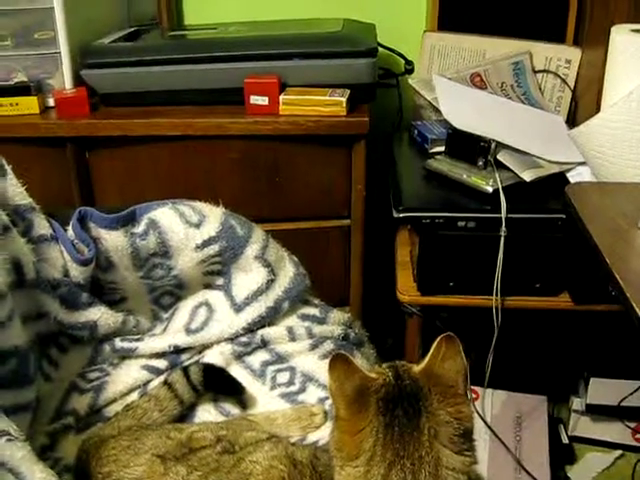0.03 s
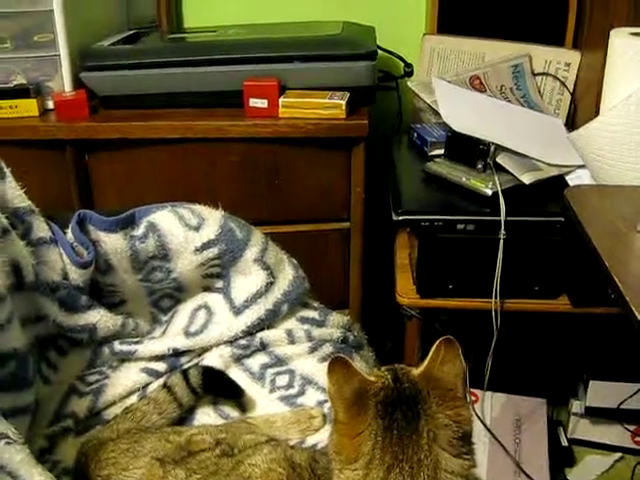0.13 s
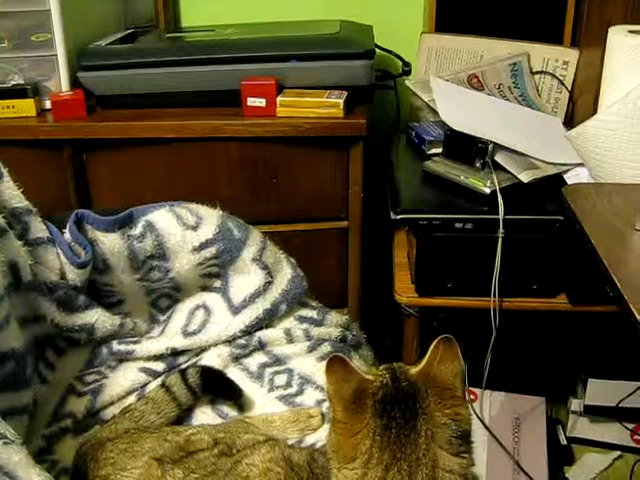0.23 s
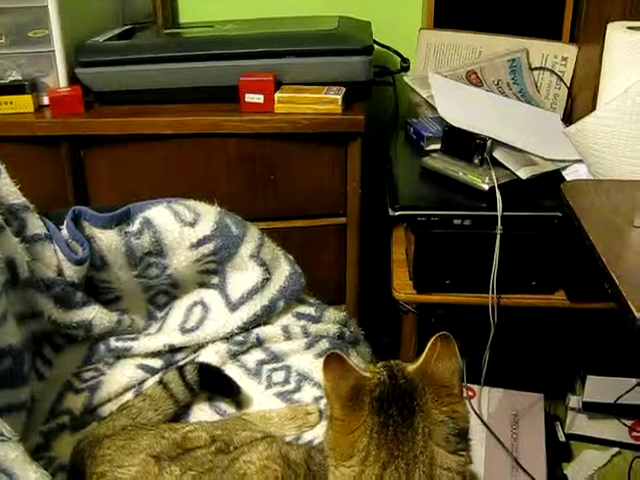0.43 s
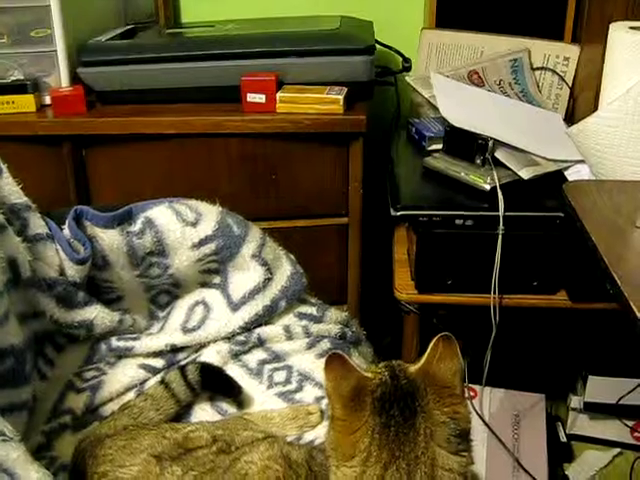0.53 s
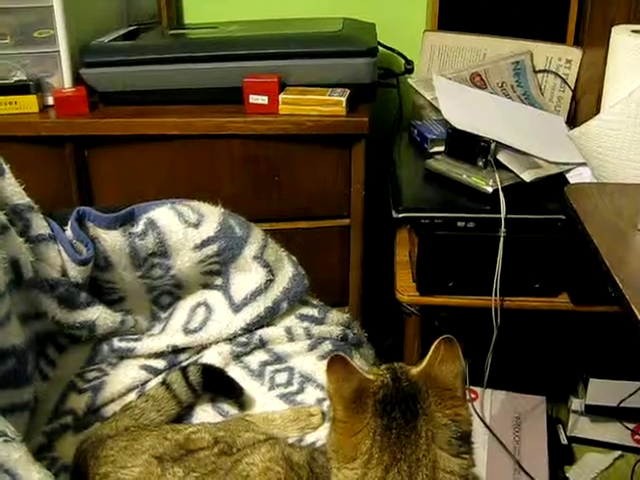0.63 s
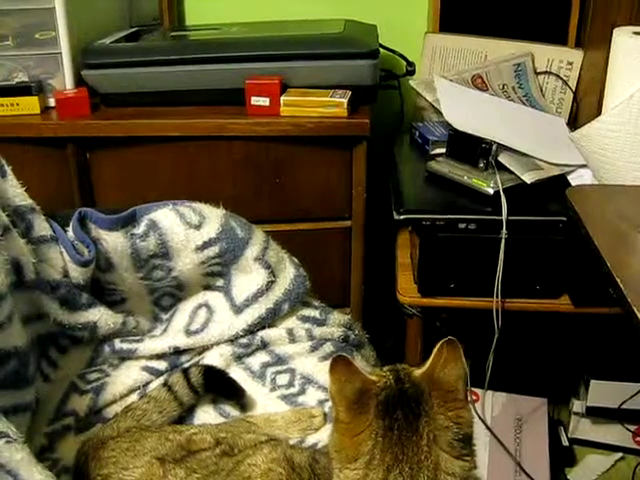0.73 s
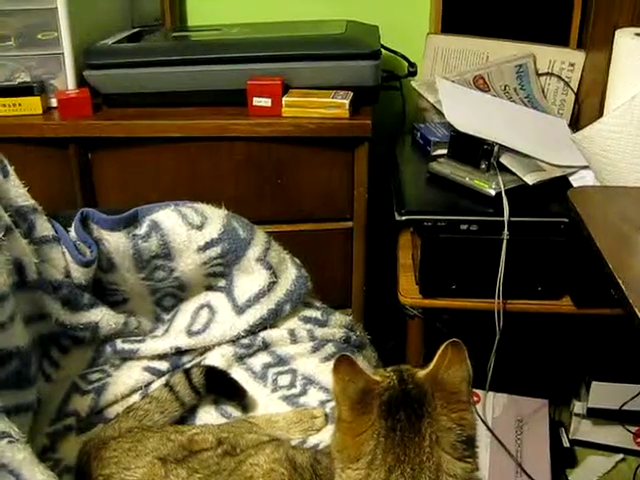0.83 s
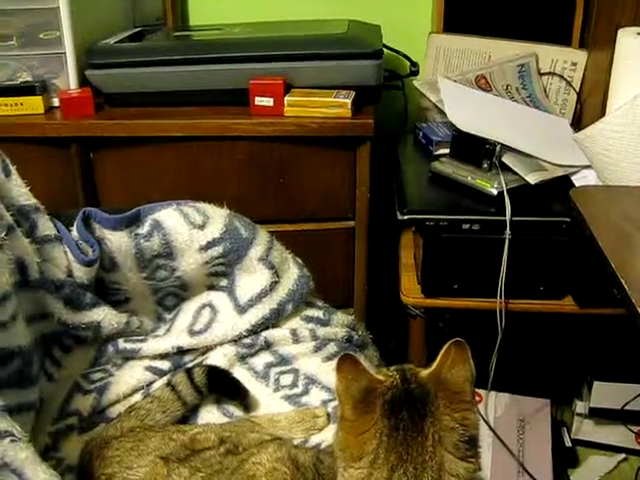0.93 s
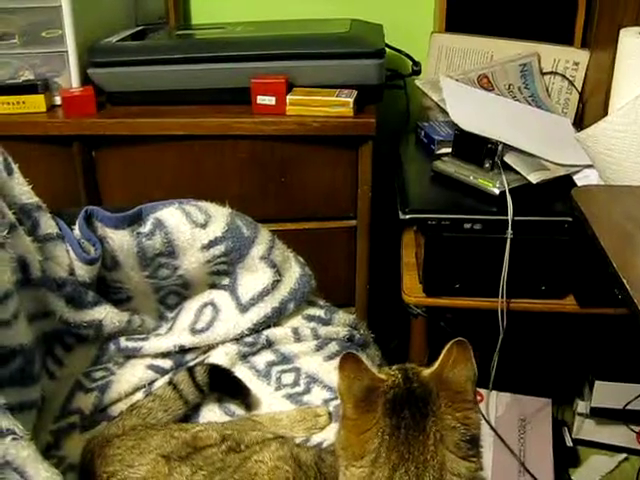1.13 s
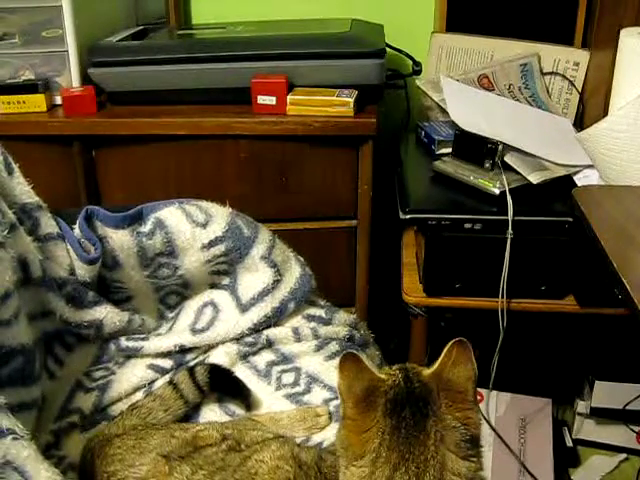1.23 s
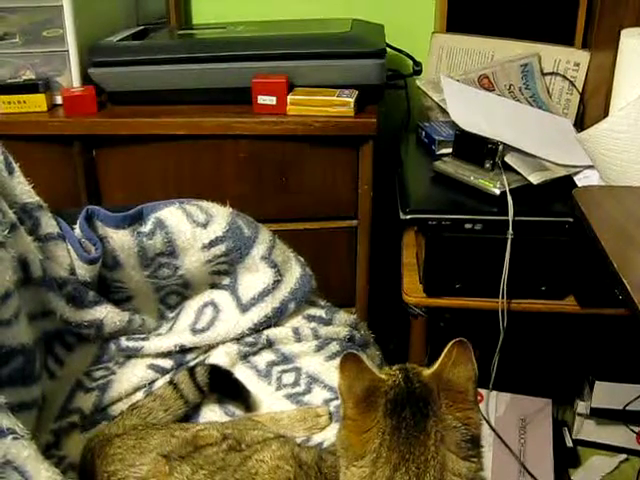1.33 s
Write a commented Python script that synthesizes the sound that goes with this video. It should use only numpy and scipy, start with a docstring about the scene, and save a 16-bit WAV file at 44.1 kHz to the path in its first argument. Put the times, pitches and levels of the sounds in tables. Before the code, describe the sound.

A desktop scanner's motor gives one short whining buzz, followed by a soft click.

```python
"""A scanner makes one short move

In a quiet room, a desktop scanner's stepper motor (one that turns in tiny steps) speeds up, whines
evenly and brakes. Its gears buzz and rattle in the plastic case, and knock as they take up and release
the load. The idle coils whistle faintly. A soft scuffing click follows, over room rumble and
microphone hiss."""
import sys
import numpy as np
from scipy import signal
from scipy.fft import rfft, irfft
from scipy.io import wavfile
from scipy.ndimage import uniform_filter1d

SR = 44100
rng = np.random.default_rng(int(sys.argv[2]) if len(sys.argv) > 2 else 0)


def unload_wav(signal):
    """Save mono or channel-first audio to the path in sys.argv[1] as 16-bit WAV at rate SR, clipped to [-1, 1]."""
    wavfile.write(
        sys.argv[1],
        SR,
        np.round(np.clip(np.atleast_2d(signal).T, -1, 1) * 32767).astype(np.int16),
    )


N = 61739
T = np.arange(N) / SR


def motor(speed, phase):
    """The whine, gear tones and fine-step whistle all follow the motor's repeating drive cycle."""
    # loudness of the main whine: time_s, level_db
    whine_levels = [(.205, -70), (.22, -54), (.232, -44), (.24, -43), (.248, -31), (.275, -33.5), (.3, -31),
                    (.335, -32.2), (.3745, -30.8), (.38, -43), (.395, -42), (.405, -52), (.425, -54),
                    (.434, -64), (.47, -80)]
    # other tones of motor and gears: multiple_of_cycle, full_speed_level_db
    gear_tones = [(18, -64), (20, -61), (24, -55.5), (25, -59), (26, -56), (32, -52.5), (36, -55.5),
                  (41, -54.5), (42, -52), (44, -57.5), (48, -63.5), (50, -56), (56, -59), (70, -61),
                  (74, -69), (84, -64)]
    # whistle of the fine steps: multiple_of_cycle, full_speed_level_db
    step_tones = [(99, -65), (100, -57), (101, -66), (150, -64), (199, -72), (200, -60.7), (300, -77)]

    def tone(multiple, db, flutter_db, flutter_hz):
        wave = np.sqrt(2) * np.sin(multiple * phase + 2 * np.pi * rng.random())
        return wave * undb(db + flutter_db * wander(flutter_hz))

    running = np.clip((speed - speed.min()) / (1 - speed.min()), 0, 1)  # 0 slowest, 1 fastest
    whine = tone(multiple=28, db=curve(whine_levels), flutter_db=.8, flutter_hz=220)
    out = room_same_level(whine, echo_db=-19)
    for multiple, db in gear_tones:
        gear = tone(multiple, db, flutter_db=2.6, flutter_hz=90)
        out += room_same_level(gear * running ** 4, echo_db=-10)
    for multiple, db in step_tones:
        whistle = tone(multiple, db, flutter_db=2.2, flutter_hz=260)
        out += room_same_level(whistle * running ** 4.5, echo_db=-8)
    return out


def gear_rattle(speed, phase):
    """Gear teeth shake the case with a steady buzz and a loose chatter, duller when slow."""
    # how strongly the case rings at each pitch: pitch_hz, gain_db
    case_colour = [(400, -22), (750, -16), (950, -11), (1120, -13), (1340, 0), (1550, -4), (1900, -10),
                   (2300, -10), (2750, -13), (3100, -22), (3850, -14), (4800, -23), (5400, -17),
                   (6000, -21), (6600, -31), (11000, -31), (15000, -36)]
    # loudness of the rattle: time_s, level_db
    levels = [(.115, -75), (.145, -56), (.185, -53.5), (.215, -51), (.222, -44), (.26, -43), (.375, -42.5),
              (.412, -45.5), (.432, -53), (.475, -56), (.535, -69)]
    buzz_share = .45
    buzz = unit(sum(np.cos(k * phase + 2 * np.pi * rng.random()) for k in range(10, 130)))
    chatter = unit(rng.standard_normal(N) * (1 + .6 * np.cos(4 * phase)))  # four pulses a cycle
    shaken = colour(np.sqrt(buzz_share) * buzz + np.sqrt(1 - buzz_share) * chatter, case_colour)
    dull = signal.sosfiltfilt(signal.butter(2, 3000, fs=SR, output="sos"), shaken)
    treble = (shaken - dull) * speed ** 2.2
    moving = (T > levels[0][0]) & (T < levels[-1][0])
    return (dull + treble) * undb(curve(levels)) * moving


def case_rings():
    """The case rings briefly as the changing speed sweeps through its natural pitches."""
    # rings of the case: peak_s, pitch_hz, level_db
    rings = [(.222, 946, -50), (.231, 1262, -39), (.392, 1320, -43), (.4, 2230, -52), (.412, 1345, -39.5),
             (.423, 946, -41.5)]
    rise_s = .005
    out = np.zeros(N)
    for peak_s, hz, db in rings:
        rise = np.exp(-(np.minimum(T - peak_s, 0) / rise_s) ** 2)
        wave = np.sqrt(2) * np.sin(2 * np.pi * (hz * T + rng.random()))
        out += undb(db) * wave * rise * fade(T - peak_s, fade_s=.075)
    return out


def step_squeaks():
    """At low speed the motor's steps make high, scratchy squeaks."""
    # bursts of noise: peak_s, half_length_s, pitch_hz, half_width_hz, level_db
    squeaks = [(.212, .014, 5600, 800, -54), (.205, .04, 5000, 3000, -61), (.2, .04, 10700, 1600, -64),
               (.415, .04, 5800, 3200, -61), (.422, .016, 10200, 2600, -60)]
    out = np.zeros(N)
    for peak_s, half_s, hz, width, db in squeaks:
        band = [(hz - width, -20), (hz - width / 3, 0), (hz + width / 3, 0), (hz + width, -20)]
        out += noise(band) * undb(db) * np.exp(-((T - peak_s) / half_s) ** 2)
    return out


def gear_knocks():
    """The slack between the gears closes with a knock, and the plastic case rings."""
    # the knocks: start_s, level_db
    knocks = [(.137, -46.5), (.162, -52), (.218, -48), (.473, -45)]
    # tones that ring in each knock: pitch_hz, gain_db, fade_s
    case_tones = [(1308, -4, .13), (1365, -6, .14), (1500, 0, .05), (1590, 0, .07), (1700, -3, .1),
                  (1900, -9, .08), (2417, -8, .08), (2750, -13, .06)]
    rise_s = .002
    out = np.zeros(N)
    for start_s, db in knocks:
        age = np.maximum(T - start_s, 0)
        ring = sum(undb(gain_db) * np.sin(2 * np.pi * (hz * age + rng.random())) * fade(age, fade_s)
                   for hz, gain_db, fade_s in case_tones)
        out += undb(db) * ring * (1 - np.exp(-age / rise_s))
    return out


def coil_whistle():
    """The current that holds the motor still whistles before the move and briefly after it."""
    before = undb(-71) * (T < .125)
    after = undb(-70) * ((T >= .505) & (T < .533))
    return wavering(14480, width_hz=120) * uniform_filter1d(before + after, size=400)


def scuff():
    """A soft, bright click runs out in a duller rub and a faint low boom."""
    # tone colour of the click: pitch_hz, gain_db
    click_colour = [(1500, -20), (4000, -6), (6400, 2), (9000, -1), (15000, 0)]
    # tone colour of the rub: pitch_hz, gain_db
    rub_colour = [(100, -15), (230, -1), (330, -10), (600, -8), (950, 4), (1200, -8), (1500, -1),
                  (2000, -10), (2500, -7), (3500, -15), (6000, -20), (12000, -35)]

    def swell(start_s, rise_s, fade_s, db):
        return undb(db) * np.clip((T - start_s) / rise_s, 0, 1) * fade(T - start_s - rise_s, fade_s)

    click = noise(click_colour) * swell(start_s=.649, rise_s=.006, fade_s=.125, db=-53.6)
    rub = noise(rub_colour) * swell(start_s=.648, rise_s=.028, fade_s=.36, db=-49.6)
    boom = wavering(203, width_hz=15) * swell(start_s=.665, rise_s=.035, fade_s=.25, db=-54)
    return click + rub + boom


def background():
    """The room rumbles softly and the microphone adds an even hiss."""
    # tone colour of the rumble: pitch_hz, gain_db
    rumble_colour = [(25, -13), (50, -6), (90, -1), (160, .3), (240, -1), (320, .3), (480, -2.7),
                     (700, -4.7), (1000, -9), (1500, -12.3), (2500, -16.3), (4000, -19.3), (6000, -23.5),
                     (7500, -33)]
    # tone colour of the hiss: pitch_hz, gain_db
    hiss_colour = [(3000, -20), (6000, -2), (9000, 0), (12850, -1), (13100, 3.5), (13700, 0), (16000, -2)]
    rumble = noise(rumble_colour) * undb(-51 + .4 * wander(15))
    return rumble + noise(hiss_colour) * undb(-64.4)


def room(x, echo_db):
    """Add the short echo of a furnished room."""
    t = T[:SR // 2]
    echo = rng.standard_normal(len(t)) * fade(t, fade_s=.34) * (t > .004)
    return x + undb(echo_db) * signal.fftconvolve(x, echo / np.linalg.norm(echo))[:N]


def room_same_level(x, echo_db):
    """Add the room's echo without changing the sound's average level."""
    return unit(room(x, echo_db)) * np.std(x)


def undb(db):
    """Turn decibels into a number to multiply by."""
    return 10 ** (np.asarray(db) / 20)


def unit(x):
    """Scale to an average (rms) level of 1."""
    return x / np.sqrt(np.mean(x ** 2))


def fade(age, fade_s):
    """Stay at 1 until age 0, then fall by 60 dB every fade_s seconds."""
    return np.exp(-np.log(1000) * np.maximum(age, 0) / fade_s)


def curve(rows):
    """Join (time_s, value) rows with straight lines."""
    return np.interp(T, *np.array(rows).T)


def colour(x, points):
    """Shape a sound by (pitch_hz, gain_db) points, falling away outside them; level 1."""
    hz, db = np.array(points).T
    log_hz = np.log(np.arange(N // 2 + 1) * SR / N + 1)
    outside = np.abs(log_hz - np.clip(log_hz, np.log(hz[0]), np.log(hz[-1])))
    gain = undb(np.interp(log_hz, np.log(hz), db)) * np.exp(-2 * outside)
    return unit(irfft(rfft(x) * gain, N))


def noise(points):
    """Noise with the given tone colour."""
    return colour(rng.standard_normal(N), points)


def wander(rate_hz):
    """A smooth random drift, about 1 in size."""
    hold = int(SR / rate_hz)
    steps = np.repeat(rng.standard_normal(N // hold + 2), hold)
    return unit(uniform_filter1d(steps, hold)[:N])


def wavering(hz, width_hz):
    """A tone of level 1 whose pitch drifts a little."""
    pitch_hz = hz + width_hz / 2 * wander(width_hz)
    return np.sqrt(2) * np.sin(2 * np.pi * np.cumsum(pitch_hz) / SR)


def scene():
    """The scanner's move and the scuff in the quiet room."""
    # how fast the motor turns: time_s, share_of_full_speed
    speed_points = [(.135, .25), (.185, .42), (.2, .55), (.22, .73), (.231, .87), (.244, 1), (.375, 1),
                    (.39, .85), (.407, .71), (.427, .635), (.47, .25)]
    full_speed_hz, wobble = 52.5, .0012  # drive cycles a second; unevenness of the speed
    speed = curve(speed_points)
    cycle_hz = full_speed_hz * speed * (1 + wobble * wander(120))
    phase = 2 * np.pi * np.cumsum(cycle_hz) / SR
    tones = motor(speed, phase) + case_rings()
    noises = gear_rattle(speed, phase) + step_squeaks() + gear_knocks() + coil_whistle() + scuff()
    return (tones + room(noises, echo_db=-10) + background())[None]


def record(dry):
    """Cut a deep notch in the treble and take off the very top."""
    notch_hz, width_hz, top_hz = 7900, 1500, 15800
    notched = signal.lfilter(*signal.iirnotch(notch_hz, notch_hz / width_hz, fs=SR), dry)
    return signal.sosfilt(signal.ellip(10, .2, 70, top_hz, fs=SR, output="sos"), notched)


dry = scene()
out = record(dry)
unload_wav(out)
```